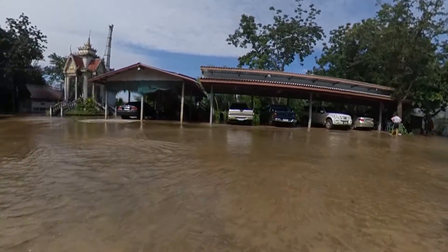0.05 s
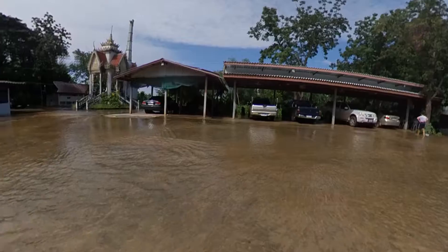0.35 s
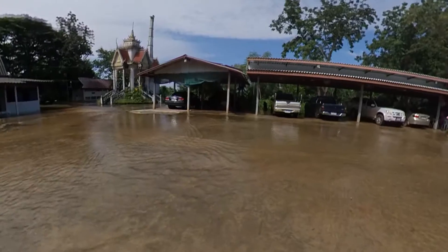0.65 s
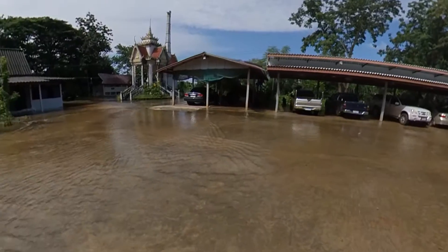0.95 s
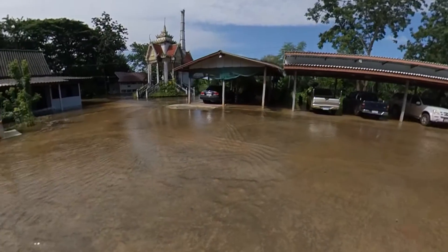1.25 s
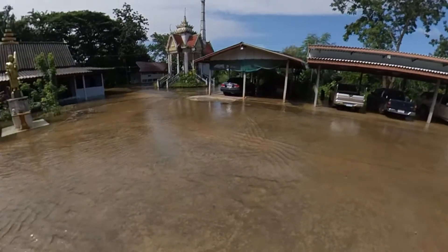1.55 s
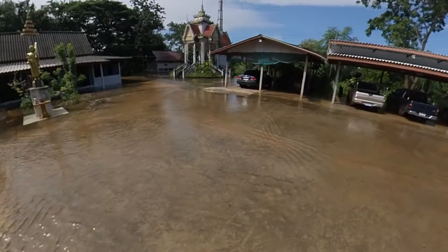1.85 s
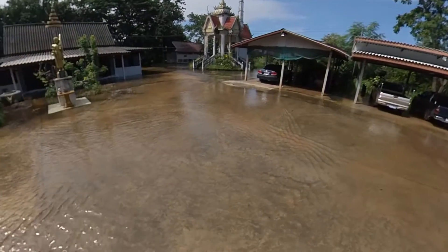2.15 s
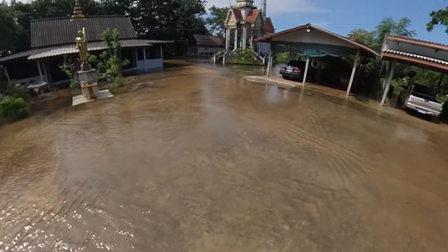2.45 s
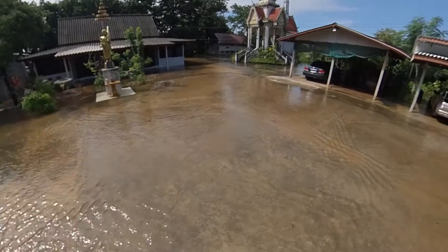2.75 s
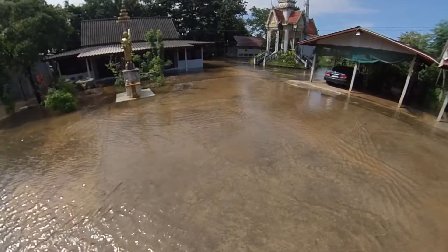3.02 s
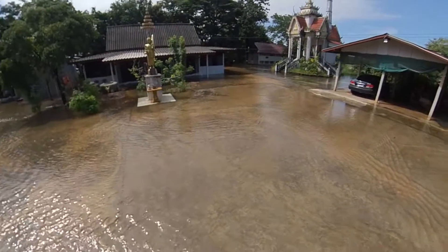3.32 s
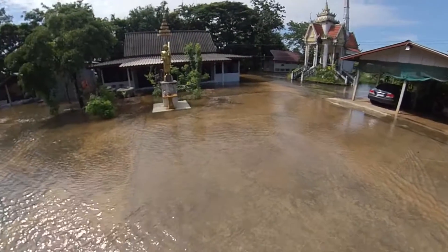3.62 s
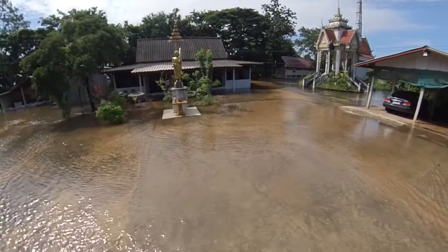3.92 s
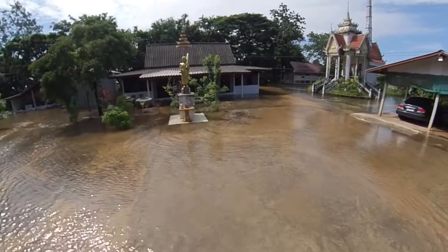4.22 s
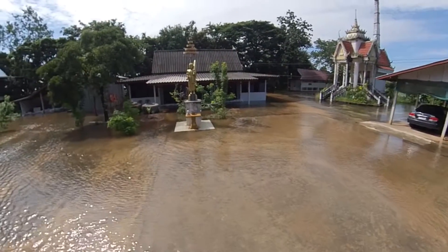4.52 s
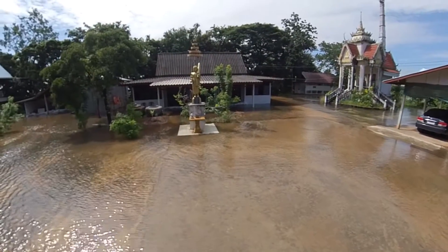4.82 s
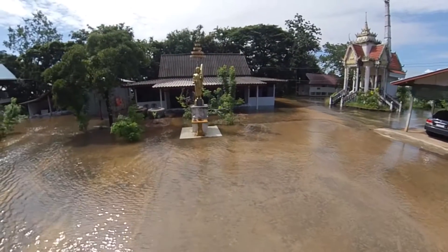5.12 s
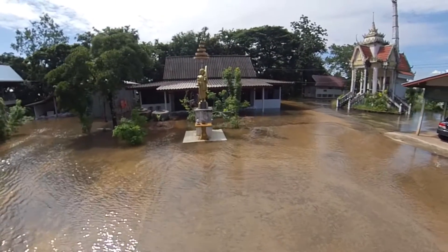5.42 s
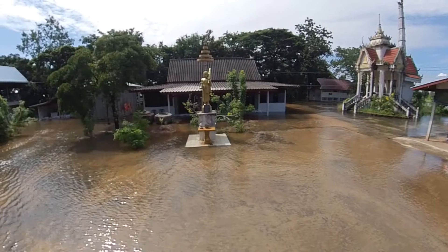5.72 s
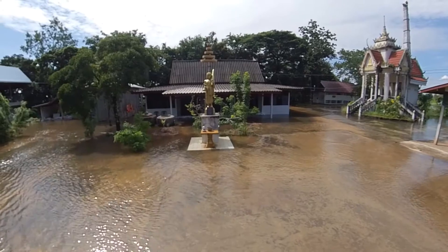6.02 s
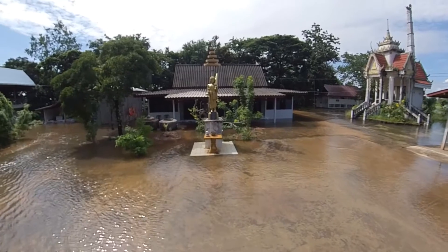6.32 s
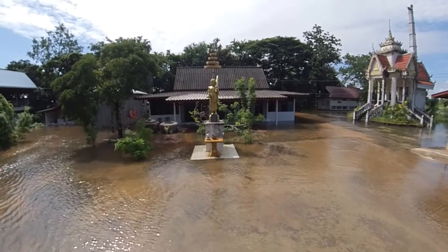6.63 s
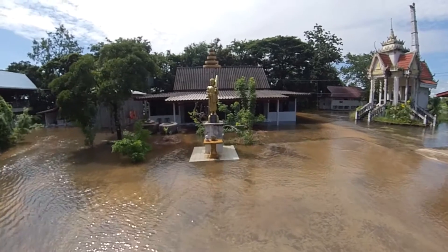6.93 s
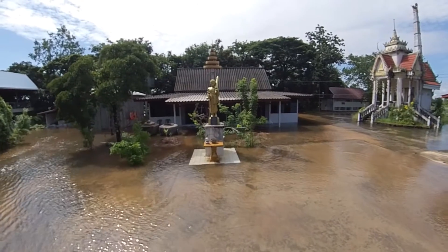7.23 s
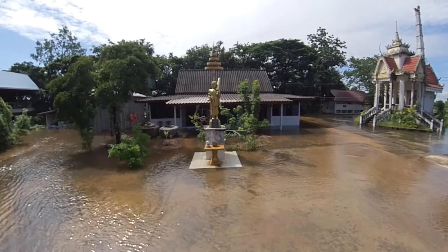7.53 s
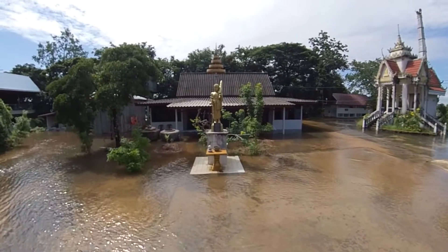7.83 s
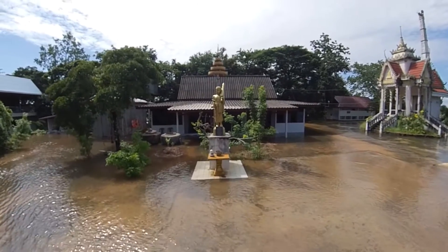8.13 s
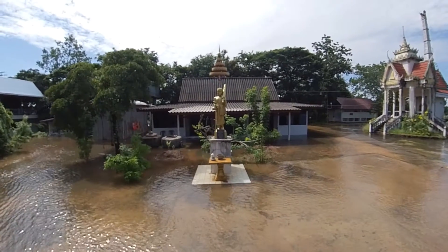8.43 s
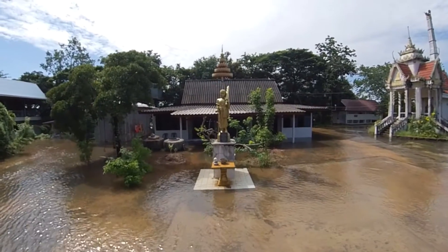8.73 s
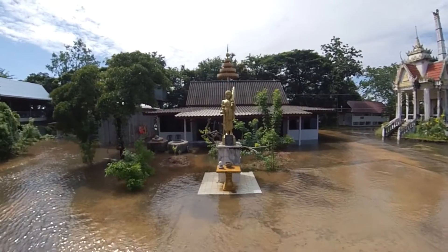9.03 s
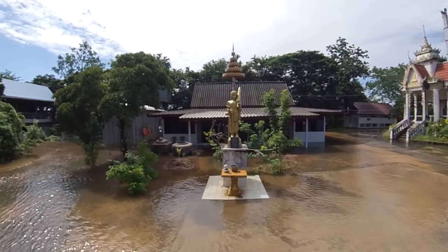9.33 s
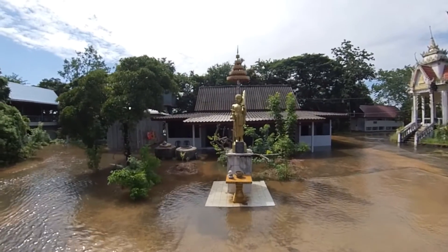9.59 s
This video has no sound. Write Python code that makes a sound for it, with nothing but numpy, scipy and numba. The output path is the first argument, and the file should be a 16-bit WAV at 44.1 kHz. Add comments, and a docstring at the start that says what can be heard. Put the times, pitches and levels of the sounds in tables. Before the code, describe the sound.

Someone wades through shallow water outdoors, each step sloshing and splashing, with drops pattering back over a faint low rumble.

```python
"""Someone in sandals wades through shallow floodwater in an open yard, camera in hand.
Each stride drags a hollow that gulps shut, pushes a sloshing wave and throws spray that patters back.
These sounds are clouds of tiny ringing air bubbles mixed with noise. Single bubbles plop, heavy drops
slap the water and one flung drop hits the camera. Behind it all, the flood ripples faintly over
a low outdoor rumble and the hum of a far engine."""
import sys
import numpy as np
from scipy import signal
from scipy.fft import rfft, irfft, next_fast_len
from scipy.io import wavfile
from scipy.ndimage import uniform_filter1d, map_coordinates
from numba import njit

SR = 44100
rng = np.random.default_rng(int(sys.argv[2]) if len(sys.argv) > 2 else 0)


def dump_mix(stems):
    """Bounce the given channels to the path in sys.argv[1] as a 16-bit WAV at rate SR."""
    frames = np.atleast_2d(stems).T  # one column per channel
    limited = np.clip(frames, -1, 1)  # hard clip at full scale
    pcm = np.round(limited * 32767).astype(np.int16)
    wavfile.write(sys.argv[1], SR, pcm)


N = 430416

# The tone of each layer, from bass to treble: (frequency [Hz], relative level [dB])
RUMBLE_TONE = [(15, -22), (25, -29), (45, -3.5), (85, 0.5), (130, -1), (200, -3.5), (400, -8), (1000, -39)]  # outdoor background
FLOOD_TONE = [(100, -22.5), (300, -6), (600, -3), (1000, 4.5), (1600, 1.5), (2500, -4), (4500, -12.5),
              (7000, -10.5), (10000, -21)]  # rippling water
GULP_TONE = [(90, -38), (170, -9.5), (240, -4), (340, 1.5), (460, -4.5), (700, 0.5), (1500, -64)]  # big air pockets closing
SLOSH_TONE = [(200, -25.5), (380, -5), (560, -4.5), (900, -0.5), (1400, -4), (2000, -7.5), (3000, -25),
              (6000, -52)]  # the wave in front of a leg
SPRAY_TONE = [(700, -15), (1400, -4.5), (2100, -1), (3000, -1), (4200, -6.5), (5500, -26), (9000, -38)]  # thrown water landing
FIZZ_TONE = [(2000, -25), (3800, -2), (5200, 0), (6500, -1), (9600, 1), (11000, -68)]  # fine droplets
PATTER_TONE = [(1500, -5.5), (2400, 3.5), (3500, -3), (4600, -2), (6000, -7), (9500, -7.5)]  # big droplets ticking on the surface
TRICKLE_TONE = [(800, -4), (1300, 6), (2200, 3), (3200, 0.5), (6000, -8.5), (9000, -10.5)]  # bubbles under water running off the legs
# How alike noise is on the left and right: (frequency [Hz], likeness [0 to 1])
STEREO_LIKENESS = [(50, 0.88), (300, 0.78), (1600, 0.76), (2500, 0.98), (4000, 0.2), (6000, 0.051),
                   (10000, 0.045)]
# Where the feet lie as the camera turns: (time [s], left delay [ms], fizz left minus right [dB])
FEET_DIRECTION = [(0, 0.22, 3.5), (.38, 0.18, 10), (.6, 0.28, 3), (.93, .23, 5), (1.5, 0.29, 2),
                  (2.4, .3, -.5), (3.3, 0.31, 0), (4.4, 0.33, -2), (5.85, 0.318, -1.5), (6.3, 0.32, -2),
                  (7.5, 0.32, -2.5), (8.4, 0.33, -1), (9.76, 0.31, -1)]
# How strongly the flood ripples: (time [s], level [dB])
RIPPLE_LEVELS = [(0, -46.5), (6.5, -44.5), (7.3, -45.5), (8.6, -44.5), (9.2, -45.5), (9.76, -44.5)]
# Notes of the struck camera case and its microphone openings. A fade time (t60) is a fall of 60 dB.
# (pitch [Hz], left level [dB], right level [dB], fade time [s])
CAMERA_NOTES = [(335, -24, -29, 0.072), (508, -27.5, -29, 0.17), (705, 19.5, 2, 0.0081),
                (1450, -1.5, -19, 0.021), (2120, -25, 8, 0.0066), (2780, -32, -17, 0.0091),
                (4260, -12, 5, 0.0044), (5080, -26, -13.5, 0.016), (5870, -26, -20, 0.013),
                (6940, -37, -20, 0.0072)]
# Single bubbles that ring out: (time [s], level [dB], starting pitch [Hz], fade time [s])
SINGLE_BUBBLES = [(.043, -24, 710, 0.033), (.043, -21, 1210, .025), (.225, -25, 1470, 0.03),
                  (.245, -23.5, 1350, 0.034), (.267, -26, 835, .03), (.29, -23, 720, .026),
                  (.3, -21, 2020, .016), (.342, -22, 4560, .01), (.366, -23, 1066, 0.039),
                  (.386, -23.5, 785, 0.038), (.577, -24, 4270, 0.017), (.618, -29, 1030, .039),
                  (.71, -27, 1690, 0.018), (.742, -31.5, 450, 0.086), (.774, -24, 1880, .02),
                  (.822, -26.5, 275, .06), (.849, -21.5, 576, 0.036), (.926, -24.5, 685, .045),
                  (.927, -23, 1290, .02), (1.037, -28, 895, 0.046), (1.157, -27, 2295, 0.011),
                  (1.17, -26, 5770, .01), (1.768, -28, 1070, .039), (1.828, -28, 1230, .033),
                  (1.955, -12, 1340, .018), (2.293, -24, 970, .03), (2.301, -22, 2750, 0.015),
                  (2.39, -24, 635, .04), (2.408, -24, 660, .035), (2.472, -31, 333, .07),
                  (2.518, -21.5, 2740, 0.013), (2.574, -26, 960, 0.033), (2.749, -25, 790, .022),
                  (2.781, -20.5, 637, 0.023), (2.953, -24, 1680, 0.017), (3.291, -32.5, 407, .04),
                  (3.31, -28, 700, 0.022), (3.345, -20.5, 2150, .014), (3.456, -21.5, 820, .039),
                  (3.471, -20, 2240, 0.015), (3.729, -25, 1210, .03), (3.978, -14, 1680, .021),
                  (3.992, -22, 620, 0.041), (4.004, -27, 790, .03), (4.054, -26.5, 770, 0.035),
                  (4.237, -20, 470, 0.041), (4.486, -26, 895, 0.056), (4.669, -24, 855, 0.035),
                  (4.912, -21, 1860, .018), (5.01, -30, 4610, .014), (5.041, -27, 1380, .03),
                  (5.25, -22, 2400, .016), (5.271, -36, 600, 0.036), (5.291, -28, 1235, 0.032),
                  (5.409, -24, 3385, .014), (5.5, -28.5, 490, .04), (5.521, -28.5, 468, .04),
                  (5.544, -21.5, 1100, 0.033), (5.669, -30.5, 493, 0.046), (5.718, -28, 1920, 0.017),
                  (5.804, -27, 573, 0.044), (5.895, -18, 1590, 0.028), (6.207, -23, 990, 0.028),
                  (6.258, -23, 3645, 0.017), (6.296, -16.5, 740, 0.022), (6.639, -32, 342, .04),
                  (6.664, -20, 348, 0.027), (6.768, -25.5, 725, 0.048), (7.015, -25, 1460, .022),
                  (7.499, -22, 2315, 0.016), (7.838, -30, 905, .035), (7.886, -24.5, 920, 0.033),
                  (7.958, -23, 960, .026), (8.006, -24.5, 840, 0.037), (8.011, -24, 1305, .025),
                  (8.376, -32.5, 320, 0.092), (8.484, -30, 523, .04), (8.551, -23.5, 895, .03),
                  (8.873, -28, 4000, .017), (8.928, -32, 947, .03), (9.351, -21.5, 1180, .016),
                  (9.4, -26, 1110, 0.04), (9.541, -22, 725, .024)]
# Drops slapping the water, except at 1.27 s: a brief faint hiss just before the knock on the camera.
# (time [s], level [dB], pitch [Hz], left minus right [dB], noisy tail compared with first burst [dB])
DROPS_AND_HISS = [(.273, -18, 7240, 18, -27), (.3648, -6.5, 5860, 4, -23), (.46, -16, 9600, 11, -16),
                  (0.469, -17, 5340, 6, -29), (.4745, -22, 7500, 6, -28), (.7113, -19, 4200, 4, -19),
                  (0.773, -13, 6630, 13, -22), (.923, -13, 6600, 9, -19), (1.27, -27, 4670, -10, -0.5),
                  (1.595, -14, 6970, 7, -23), (1.714, -23, 2370, 2, -24), (1.956, -21, 2200, 2, -13),
                  (1.9894, -19, 8700, 8, -18), (2.589, -16.5, 7300, 5, -13), (2.6819, -14, 3200, 1, -20.5),
                  (3.237, -17, 9560, 7, -20), (3.4582, -10.5, 3340, 0, -18), (3.48, -11.5, 5940, -1, -13),
                  (3.636, -19.5, 9500, -1, -22.5), (3.7234, -17.5, 3300, -2, -15.5),
                  (3.8525, -22, 3130, 0, -25), (3.9798, -11, 2720, 0, -22.5), (4.367, -16.5, 7100, -4, -15),
                  (4.523, -16, 2240, 0, -21), (4.577, -23, 9300, 6, -21), (4.701, -21.5, 2800, 2, -14.5),
                  (4.817, -20, 2410, 3, -15), (4.84, -19, 5240, -2, -20), (4.859, -17, 3000, 0, -28),
                  (5.1322, -23, 2000, 0, -14), (5.4845, -12, 2130, 4, -29), (5.7513, -7, 9470, -3, -24),
                  (5.762, -24.5, 3100, 1, -20), (5.771, -18.5, 6130, -3, -28),
                  (5.806, -22, 2670, -3, -11.5), (6.165, -21, 7640, 0, -16), (6.209, -19, 3470, 0, -21),
                  (6.296, -18, 1290, 2, -19), (6.6427, -24, 2930, -3, -29), (6.719, -21, 6470, -5, -20),
                  (6.913, -20, 3540, -2, -26), (6.979, -31, 6440, -4, -22), (7.179, -27, 6500, -1, -15),
                  (7.3303, -24, 2500, 0, -20), (7.4545, -32, 2770, 0, -21), (7.961, -28, 2400, 0, -24),
                  (8.2285, -23, 6250, -3, -22), (8.4606, -11, 2020, -3, -24), (8.846, -28.5, 3000, -2, -9),
                  (9.351, -17, 2600, 2, -19), (9.354, -22, 9000, -1, -19), (9.372, -24, 6500, -3, -26),
                  (9.386, -17.5, 5500, -4, -20)]
# Water kicked up or falling back: (start [s], length [s], slosh [dB], spray [dB], fizz [dB])
FOOT_SPLASHES = [(-0.02, 0.099, -40, -34.5, -39), (0.116, 0.17, -44, -42, -45.5),
                 (0.262, 0.06, -38.5, -41.5, -40), (0.319, 0.05, -41.5, -36, -37.5),
                 (0.437, 0.026, -39, -43, -56), (0.57, 0.13, -53, -48, -49.5),
                 (0.686, 0.042, -38, -41.5, -37.5), (1.095, 0.045, -39.5, -38.5, -40),
                 (1.213, 0.019, -37.5, -42, -56), (1.308, 0.03, -48, -47, -50),
                 (1.423, 0.11, -43, -41.5, -42.5), (1.501, 0.048, -47.5, -38, -40.5),
                 (1.696, 0.2, -57, -47.5, -46.5), (1.805, 0.17, -42, -48.5, -50),
                 (2.105, 0.1, -44.5, -50, -55), (2.216, 0.044, -47, -43.5, -50),
                 (2.246, 0.04, -47, -39.5, -45.5), (2.548, 0.03, -44, -43.5, -49),
                 (2.63, 0.16, -43.5, -50.5, -57.5), (2.915, 0.16, -43, -48, -51.5),
                 (3.014, 0.13, -47.5, -40, -46.5), (3.066, 0.04, -50, -44, -47),
                 (3.217, 0.19, -45.5, -44.5, -46), (3.423, 0.025, -38, -37.5, -42),
                 (3.627, 0.16, -44, -44, -55), (4.154, 0.16, -43, -52, -57.5), (4.36, 0.03, -46, -44, -46),
                 (4.414, 0.082, -40.5, -38, -44.5), (4.54, 0.019, -42, -51, -53),
                 (4.677, 0.067, -41.5, -43.5, -44), (4.788, 0.05, -36, -39, -45.5),
                 (4.89, 0.027, -51, -42.5, -54), (5.07, 0.077, -43.5, -42.5, -57),
                 (5.498, 0.17, -43, -50.5, -54), (5.792, 0.24, -49, -43, -47),
                 (6.141, 0.053, -42.5, -39, -41), (6.25, 0.06, -41.5, -53, -49.5),
                 (6.39, 0.093, -41.5, -46, -55.5), (6.766, 0.1, -45, -43, -49),
                 (6.935, 0.09, -44.5, -53.5, -52), (7.157, 0.089, -45.5, -61, -59.5),
                 (7.3, 0.026, -56, -53, -56), (7.426, 0.11, -50, -44, -48),
                 (7.772, 0.18, -45, -45.5, -47.5), (8.125, 0.05, -48.5, -46, -58),
                 (8.206, 0.035, -56, -42, -47.5), (8.712, 0.23, -52, -54, -56.5),
                 (9.04, 0.12, -59, -46.5, -50), (9.327, 0.029, -51, -50, -50.5),
                 (9.389, 0.1, -45, -44.5, -47.5), (9.656, 0.12, -47.5, -48, -52)]
# A leg plunging forward:
# (peak time [s], swell [s], ebb [s], gulp [dB], slosh [dB], spray [dB], fizz [dB])
LEG_PLUNGES = [(0.85, 0.037, 0.15, -43, -34, -35.5, -38), (2.44, 0.1, 0.12, -43, -36, -40, -43.5),
               (3.92, 0.11, 0.13, -46.5, -33, -38, -42.5), (5.31, 0.16, 0.17, -44.5, -35.5, -38.5, -45.5),
               (6.66, 0.06, 0.098, -44, -35.5, -38, -46), (8.46, 0.1, 0.14, -47.5, -34.5, -39, -47)]


def amp(db):
    """Turn decibels into a number to multiply a sound by."""
    return 10 ** (np.asarray(db) / 20)


def unit(x):
    """Scale a signal to an average (rms) strength of 1."""
    return x / np.sqrt(np.mean(x ** 2) + 1e-20)


def value_at(points, hz):
    """Read between the rows of a (frequency, value) table, spacing octaves evenly."""
    freqs, values = np.transpose(points)
    return np.interp(np.log(hz + 1), np.log(freqs + 1), values)


def curves(rows):
    """Turn each column after the time into one value per sample."""
    times, *columns = np.transpose(rows)
    return [np.interp(np.arange(N) / SR, times, column) for column in columns]


def wobble(rate):
    """A smooth curve through `rate` random points a second."""
    points = rng.standard_normal(int(N * rate / SR) + 4)
    return map_coordinates(points, [np.arange(N) * rate / SR])


def filtered(x, gain_at):
    """Turn each frequency up or down by gain_at(frequency)."""
    size = next_fast_len(N + SR // 2)
    return irfft(rfft(x, size) * gain_at(np.fft.rfftfreq(size, 1 / SR)), size)[..., :N]


def add(track, time, sound):
    """Mix a sound into the track at a time in seconds."""
    start = round(time * SR)
    sound = sound[..., max(-start, 0):]
    part = track[:, max(start, 0):][:, :sound.shape[-1]]
    part += sound[..., :part.shape[1]]


def rush(tone):
    """Rushing noise whose left and right are alike in the bass and unrelated in the treble."""
    def gains(hz):
        width = np.arccos(np.clip(value_at(STEREO_LIKENESS, hz), -1, 1)) / 2
        return amp(value_at(tone, hz)) * [np.cos(width), np.sin(width)]
    middle, side = filtered(rng.standard_normal((2, N)), gains)
    return unit(np.array([middle + side, middle - side]))


def patchy(x, depth_db):
    """Bubbles of one size are born together, so random patches of pitch get louder and softer."""
    slices = signal.stft(x, nperseg=512)[2]
    patches = rng.standard_normal(slices.shape[1:])
    for _ in range(2):
        patches = uniform_filter1d(patches, size=3, axis=0)  # smooth across pitch
        patches = uniform_filter1d(patches, size=6, axis=1)  # smooth across time
    return signal.istft(slices * amp(depth_db * unit(patches)), nperseg=512)[1][:, :N]


@njit
def ring_bubbles(start, pitch, life, strength, rise, length):
    """Each bubble is a fading tone that climbs as it nears the surface. Times are in samples."""
    out = np.zeros(length)
    for k in range(len(start)):
        for i in range(max(int(start[k]) + 1, 0), min(int(start[k] + life[k]), length)):
            age = i - start[k]
            progress, turns = age / life[k], age * pitch[k]
            loudness = strength[k] * np.exp(-6.9 * progress) * min(2 * turns, 1)
            out[i] += loudness * np.sin(2 * np.pi * turns * (1 + rise * progress))
    return out


def bubble_cloud(tone, low_hz, high_hz, count, cycles, spread_db, noise_db, patchy_db, pan_db,
                 flicker_db, rise=0.2, scatter_ms=0.0086):
    """Many bubbles of mixed sizes, each ringing for about `cycles` vibrations, over rushing noise."""
    when, pitch_place = rng.random((2, count))
    loud, lasting, side, pan = np.clip(rng.standard_normal((4, count)), -2.2, 2.2)
    pitch = low_hz * (high_hz / low_hz) ** pitch_place
    life = cycles * amp(3 * lasting) * SR / pitch
    strength = pitch * amp(spread_db * loud)
    # each bubble has its own spot, so left and right hear it at different times and strengths
    offset = side * scatter_ms * SR / 1000
    cloud = np.array([
        ring_bubbles(when * N + ear * offset, pitch / SR, life, strength * amp(pan_db * ear * pan), rise, N)
        for ear in (1, -1)])
    cloud = unit(filtered(cloud, lambda hz: amp(value_at(tone, hz))))
    water = patchy(cloud + amp(noise_db) * rush(tone), patchy_db)
    return unit(water * amp(flicker_db * wobble(70)))


def far_background():
    """Low outdoor rumble and the wavering hum of a far engine."""
    engine_hz = 125 + 3.07 * wobble(10)
    hum = np.sin(2 * np.pi * np.cumsum(engine_hz) / SR) * amp(-63 + 3.1 * wobble(6.7))
    return amp(-56.5) * rush(RUMBLE_TONE) * amp([[.8], [-.8]]) + hum


def flood():
    """The stirred water keeps rippling between the steps."""
    loudness = amp(curves(RIPPLE_LEVELS)[0] + 0.43 * wobble(3))
    return loudness * bubble_cloud(
        FLOOD_TONE, 362.4, 9680, count=7000, cycles=60, spread_db=1.5,
        noise_db=4, patchy_db=4, pan_db=5, flicker_db=1.5, scatter_ms=0.032)


def camera_hit(time=1.2877, bounce_delay_s=0.0082, crack_t60=0.0096):
    """A flung drop strikes the camera: a crack, each side rings its own way and a dull knock follows."""
    out, t = np.zeros((2, N)), np.arange(SR // 5) / SR

    def ring(hz, t60):
        onset = 1 - np.exp(-t * hz / 0.88)
        return onset * amp(-60 * t / t60) * np.sin(2 * np.pi * hz * t)
    case = sum(amp([[left], [right]]) * ring(hz, t60) for hz, left, right, t60 in CAMERA_NOTES)
    band = signal.butter(1, [2600, 8500], "bandpass", fs=SR)
    crack = unit(signal.lfilter(*band, rng.standard_normal((2, len(t)))))
    add(out, time, case + amp([[-13], [-5]]) * crack * amp(-60 * t / crack_t60))
    add(out, time + bounce_delay_s, amp([[-10], [-19]]) * ring(hz=760, t60=0.026))
    return signal.lfilter(*signal.butter(1, 160, "highpass", fs=SR), out)


def plops(rise=0.077, onset_s=0.0013):
    """Single bubbles pinch off and ring with a rising pitch."""
    out, t = np.zeros((2, N)), np.arange(SR // 8) / SR
    onset = 1 - np.exp(-t / onset_s)
    for time, db, hz, t60 in SINGLE_BUBBLES:
        ring = np.sin(2 * np.pi * hz * t * (1 + rise * np.minimum(t / t60, 2)))
        add(out, time, amp(db - 60 * t / t60) * onset * ring)
    return out


def drops_and_hiss(onset_s=0.0003, burst_t60=0.0018, ring_t60=0.0078, tail_t60=0.079):
    """A drop slaps the water, traps a ringing bubble and splats. The sound at 1.27 s is just a hiss."""
    out, t = np.zeros((2, N)), np.arange(SR // 15) / SR
    onset = 1 - np.exp(-t / onset_s)
    for time, db, hz, pan_db, tail_db in DROPS_AND_HISS:
        band = signal.butter(2, [hz / 1.7, min(hz * 2.6, .45 * SR)], "bandpass", fs=SR)
        noise = rng.standard_normal(len(t)) + 0.31 * rng.standard_normal((2, len(t)))
        noise = unit(signal.lfilter(*band, noise))
        burst = noise * amp(-60 * t / burst_t60)
        tail = noise * amp(tail_db - 60 * t / tail_t60)
        ring = np.sin(2 * np.pi * hz * t) * amp(-60 * t / ring_t60)
        left_right = amp(db + pan_db * np.array([[.5], [-.5]]))
        add(out, time, left_right * onset * (burst + tail + 0.5 * ring))
    return out


def splash_power(onset_s=0.022, swell_db_per_s=7.5):
    """A splash starts fast, grows a little while water falls, then dies. It is too shallow to gulp."""
    power, t = np.zeros((4, N)), np.arange(2 * SR // 3) / SR
    fade_db_per_s = np.c_[[70, 104.5, 89.5]]  # slosh, spray, fizz
    onset = np.minimum(t / onset_s, 1)
    for start, length, *db in FOOT_SPLASHES:
        change_db = swell_db_per_s * t - fade_db_per_s * np.maximum(t - length, 0)
        add(power[1:], start, (onset * amp(np.c_[db] + change_db)) ** 2)
    return power


def plunge_power():
    """As a leg plunges, gulp, slosh, spray and fizz swell and ebb. The deep gulp is the shortest."""
    power, t = np.zeros((4, N)), np.arange(-SR // 2, SR // 2) / SR
    fall_db = np.c_[[6.9, 5.04, 4.6, 3.1]]  # each layer, one swell before or one ebb after the peak
    for peak_time, swell, ebb, *db in LEG_PLUNGES:
        from_peak = t / np.where(t < 0, swell, ebb)
        add(power, peak_time + t[0], amp(np.c_[db] - fall_db * from_peak ** 2) ** 2)
    return power


def wading():
    """Air pockets gulp, the wave sloshes, thrown water patters back and fine droplets fizz."""
    surges = np.array([amp(depth_db * wobble(22)) for depth_db in (1.0, 0.94, 0.73, 0.22)])
    hollow, wave, thrown, mist = np.sqrt(plunge_power() + splash_power()) * surges
    gulp = hollow * amp(1.5) * bubble_cloud(
        GULP_TONE, 163, 624, count=1800, cycles=16, spread_db=4.5,
        noise_db=-2.5, patchy_db=1.5, pan_db=1, flicker_db=1)
    slosh = wave * amp(-1.08) * bubble_cloud(
        SLOSH_TONE, 404.7, 2584, count=4200, cycles=30, spread_db=2,
        noise_db=-6, patchy_db=1.5, pan_db=0, flicker_db=1.5)
    spray = thrown * amp(-2.5) * bubble_cloud(
        SPRAY_TONE, 1337, 5540, count=11000, cycles=34, spread_db=4.8,
        noise_db=-4, patchy_db=2.5, pan_db=1.6, flicker_db=0.1)
    fizz = mist * amp(3.5) * bubble_cloud(
        FIZZ_TONE, 3866, 10700, count=13000, cycles=47, spread_db=5.2,
        noise_db=5.5, patchy_db=4.5, pan_db=4.5, flicker_db=1.83, scatter_ms=0.025)
    fizz *= amp(curves(FEET_DIRECTION)[1] * [[.5], [-.5]])
    # bigger droplets land one by one, each with a short tick
    patter = thrown * amp(-7) * bubble_cloud(
        PATTER_TONE, 1806, 8200, count=1500, cycles=28, spread_db=2.5,
        noise_db=-31, patchy_db=-1, pan_db=2, flicker_db=-0.5)
    # water running off the legs traps fewer bubbles, which ring longer
    trickle = thrown * amp(-4.5) * bubble_cloud(
        TRICKLE_TONE, 1011, 8030, count=800, cycles=75, spread_db=2,
        noise_db=-25.5, patchy_db=1, pan_db=2, flicker_db=0.5, rise=0.035)
    return (gulp + slosh) * amp([[.8], [-.8]]) + spray + patter + trickle + fizz


def scene():
    """The feet are off to the right, so nearby sounds reach the left side a little late."""
    left, right = wading() + plops() + drops_and_hiss() + camera_hit() + flood()
    delay_samples = curves(FEET_DIRECTION)[0] * SR / 1000
    late_left = map_coordinates(left, [np.arange(N) - delay_samples])
    return np.array([late_left, right]) + far_background()


def record(dry, ceiling=0.8, top_hz=9900):
    """The camera rounds off the loudest peaks and cuts away the highest treble."""
    rounded = dry / (1 + np.abs(dry / ceiling) ** 6) ** (1 / 6)
    return filtered(rounded, lambda hz: 1 / np.sqrt(1 + (hz / top_hz) ** 120))


dry = scene()
out = record(dry)
dump_mix(out)
```